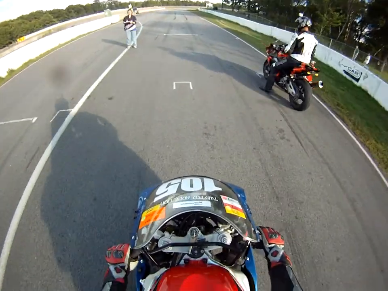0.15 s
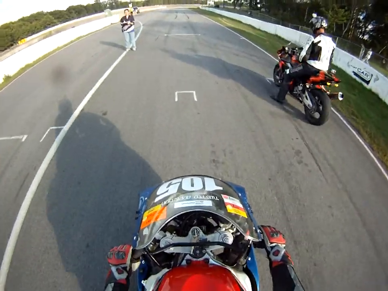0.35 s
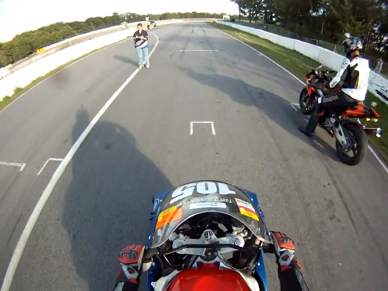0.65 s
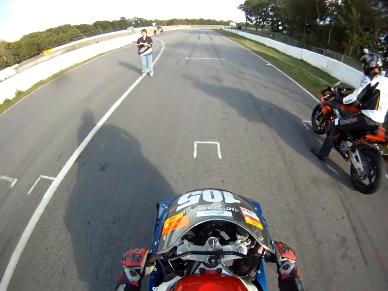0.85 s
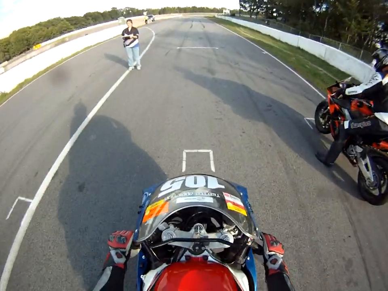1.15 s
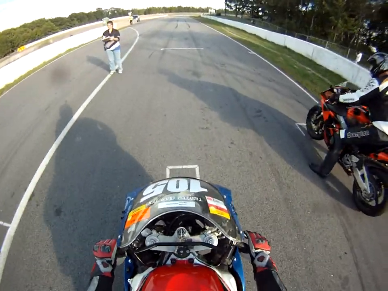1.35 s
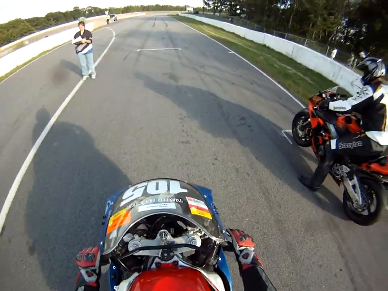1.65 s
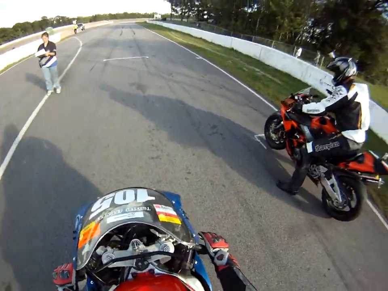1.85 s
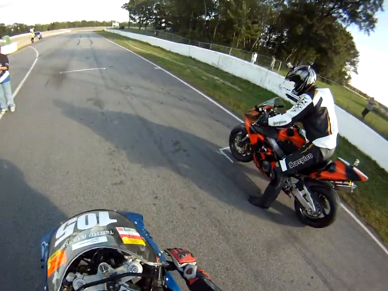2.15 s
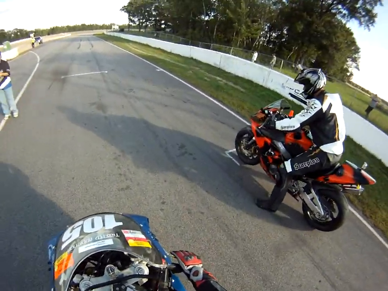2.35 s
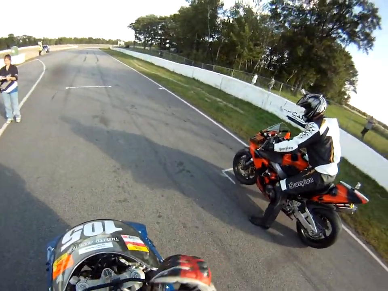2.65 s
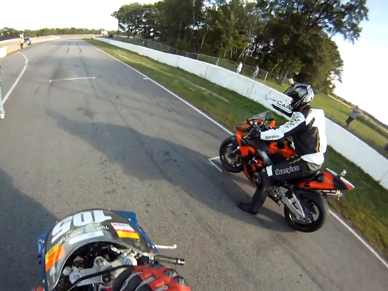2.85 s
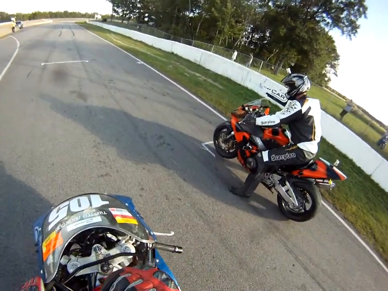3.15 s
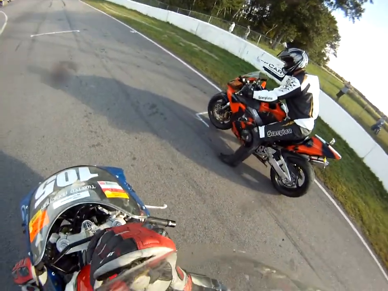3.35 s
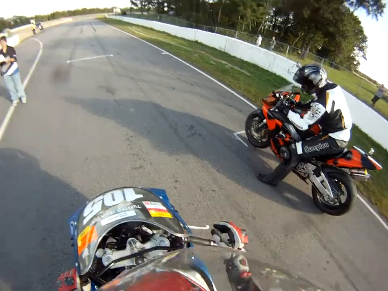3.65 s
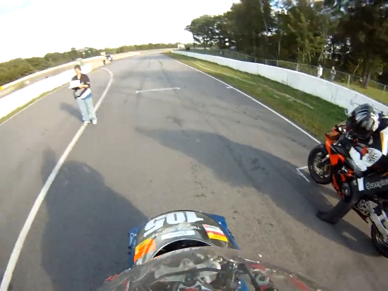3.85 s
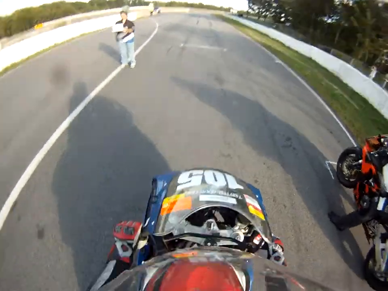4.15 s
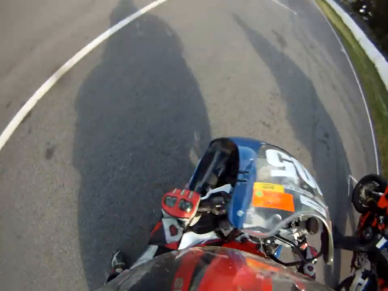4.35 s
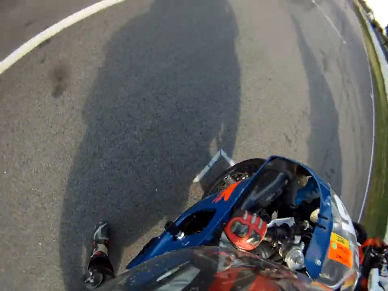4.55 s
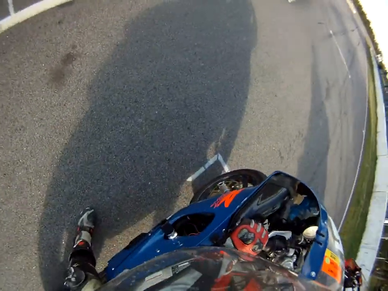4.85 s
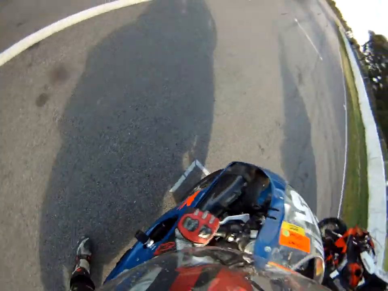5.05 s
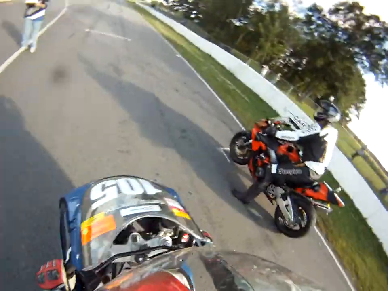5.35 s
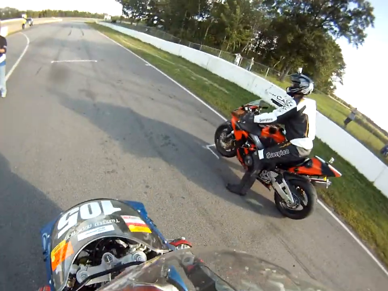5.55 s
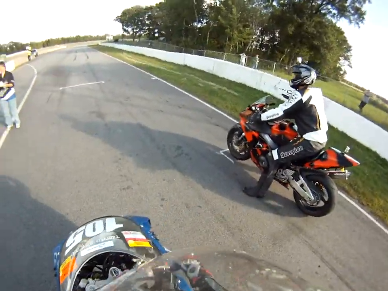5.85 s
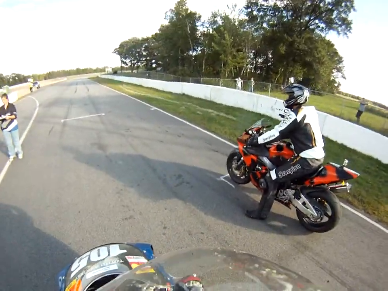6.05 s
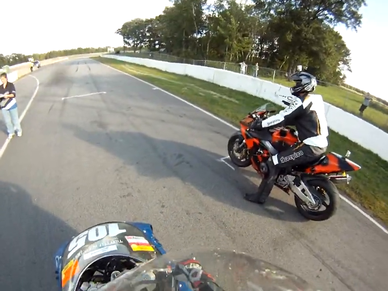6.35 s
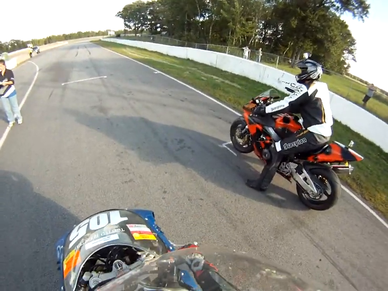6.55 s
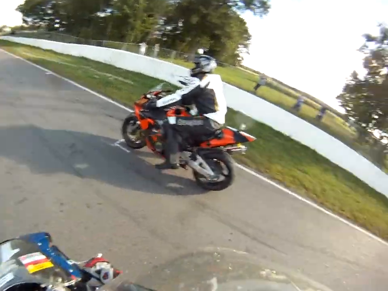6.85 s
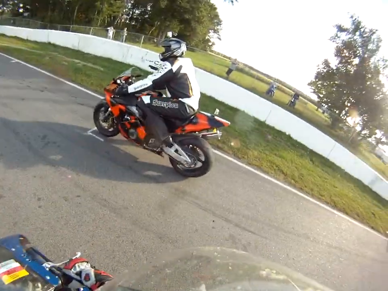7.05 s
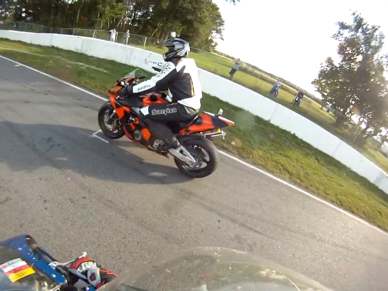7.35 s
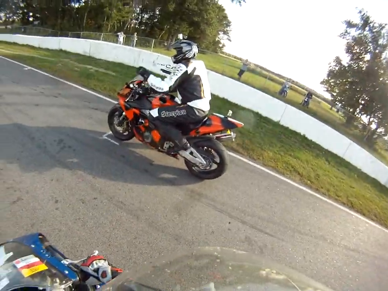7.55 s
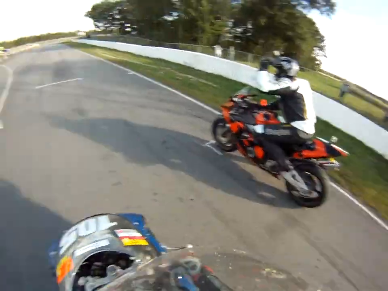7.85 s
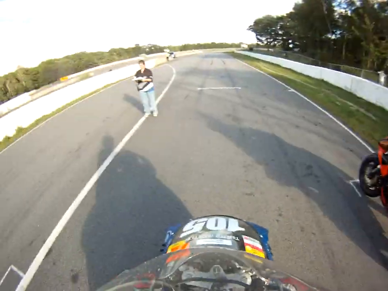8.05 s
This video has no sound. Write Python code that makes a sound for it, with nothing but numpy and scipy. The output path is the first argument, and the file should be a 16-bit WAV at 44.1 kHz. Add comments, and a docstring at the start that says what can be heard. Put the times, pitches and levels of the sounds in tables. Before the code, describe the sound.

Muffled low motorcycle idling with a faint whistle, interrupted by clipping plastic thumps, gritty scrapes and scattered sharp taps against the microphone.

```python
"""Two sport motorcycles idle on a starting grid, under a faint whistle, heard by a helmet camera in a plastic case.
Engines are uneven exhaust pulses, sine drones and fluttering noise; the case muffles them into narrow bands.
Then the rider handles the helmet and looks about: the case clicks, scrapes, squeaks, and sways on its mount.
Bursts of force ring the case's resonances, and fading low sines make the sway.
The hardest knocks clip, and the gain control briefly turns everything down."""
import sys
import numpy as np
from scipy import signal
from scipy.fft import rfft, irfft, next_fast_len
from scipy.io import wavfile
from scipy.ndimage import minimum_filter1d, map_coordinates

SR = 44100
rng = np.random.default_rng(int(sys.argv[2]) if len(sys.argv) > 2 else 0)


def file_out(sig):
    """Save sig as 16-bit WAV at sys.argv[1]."""
    # one column per channel
    cols = np.atleast_2d(sig).T
    # limit, then scale
    lim = np.clip(cols, -1, 1)
    pcm = np.round(lim * 32767).astype(np.int16)
    wavfile.write(sys.argv[1], SR, pcm)


N = 362495
SECONDS = np.arange(N) / SR


def amp(db):
    """Turn decibels into a plain factor."""
    return 10 ** (np.asarray(db) / 20)


def unit(x):
    """Scale a sound to an average (rms) strength of 1."""
    return x / np.sqrt(np.mean(x ** 2) + 1e-20)


def wobble(rate):
    """A smooth random curve with rate random points a second."""
    points = rng.standard_normal(int(N * rate / SR) + 4)
    return map_coordinates(points, [np.arange(N) * rate / SR])


def filtered(x, response):
    """Colour x by a response that depends on frequency."""
    m = next_fast_len(len(x) + SR // 10)
    spectrum = rfft(x, m) * response(np.fft.rfftfreq(m, 1 / SR))
    return irfft(spectrum, m)[:len(x)]


def add(track, s, db, sound):
    """Lay a sound into the track at s seconds with a peak of db."""
    start = round(s * SR)
    part = track[start:start + len(sound)]
    part += amp(db) * sound[:len(part)] / np.abs(sound).max()


def banded(bands, flutter=1):
    """Noise of rms 1, fluttering in level, passed through a set of resonant bands."""
    def gain(f):
        power = sum((amp(db) / (1 + ((f - hz) / width) ** 2)) ** 2 for hz, width, db in bands)
        return np.sqrt(power)
    return unit(filtered(flutter * rng.standard_normal(N), gain))


def swell(at, rise, fall):
    """A rounded rise to 1 at a moment, and a fall after it."""
    t = SECONDS - at
    return 1 / np.cosh(np.clip(t / np.where(t < 0, rise, fall), -40, 40))


def modes(f, rows):
    """Ringing resonances; each row is pitch in Hz, width in Hz, strength as a factor."""
    return sum(gain * 1j * f * w / (hz * hz - f * f + 1j * f * w) for hz, w, gain in rows)


def breeze():
    """Light air presses unevenly on the case: a very low, drifting rumble of noise."""
    return amp(-52.5 + 1.6 * wobble(2.93)) * banded([(11, 31, 0)])


# Swells of a thin whistle.
# Each row: start in seconds, length in seconds, level in dB, pitch in Hz at the top of the swell.
WHISTLE_SWELLS = [(.02, .62, -54, 3660), (.74, .42, -54, 3720), (1.17, .58, -48.5, 3625),
                  (3.5, .45, -56.5, 3650), (4.4, 1.1, -50.5, 3490)]
WHISTLE_ARCH_HZ = 107.8  # pitch lost at the ends of a swell
WHISTLE_UPPER_HZ, WHISTLE_UPPER_DB = 8390, -7  # the upper note, in dB against the lower


def whistle():
    """A faint, fuzzy two-note whistle; each swell arches in strength and pitch, wavering and flickering."""
    level, hz = np.zeros(N), np.zeros(N)
    for s, length, db, top_hz in WHISTLE_SWELLS:
        on = (SECONDS > s) & (SECONDS < s + length)
        arch = np.sin(np.pi * (SECONDS[on] - s) / length)
        level[on] = amp(db) * np.sqrt(arch)
        hz[on] = top_hz - WHISTLE_ARCH_HZ * (1 - arch)

    def tone(pitch):
        fuzz = .6 * (wobble(170) + 1j * wobble(170)) + .4
        turns = np.cumsum(pitch + 28 * wobble(40)) / SR
        return np.real(fuzz * np.exp(2j * np.pi * turns))

    upper = tone(WHISTLE_UPPER_HZ + 60 * wobble(4.4))
    flicker_db = 2.5 * wobble(28)
    return level * amp(flicker_db) * (tone(hz) + amp(WHISTLE_UPPER_DB) * upper)


# The colour of the exhausts inside the case.
# Each row: frequency in Hz, relative level in dB per Hz.
EXHAUST_COLOUR = [(8, -9), (25, -36), (45, -1.5), (70, -0.5), (120, 1.5), (190, -2.5), (280, -4.5),
                  (340, -11), (450, -23), (700, -31.5), (1200, -52)]


def muffled(x):
    """The colour of the exhausts inside the case, at rms 1."""
    hz, db = np.transpose(EXHAUST_COLOUR)

    def colour(f):
        return amp(np.interp(np.log(f + 1), np.log(hz), db)) * (f < 2 * hz[-1])
    return unit(filtered(x, colour))


def firings(turns, cylinders, scatter):
    """One exhaust pulse per firing; the four cylinders differ and idle combustion is uneven."""
    at = np.flatnonzero(np.diff(np.floor(turns)))
    pulses = np.zeros(N)
    pulses[at] = np.resize(cylinders, len(at)) * (1 + scatter * rng.standard_normal(len(at)))
    return muffled(pulses - pulses.mean())


# Loudness of the neighbour's engine. Each row: time in seconds, level in dB.
NEIGHBOUR_LEVEL = [(0, -44), (.9, -47.5), (1.6, -54), (4, -44), (5, -45.5), (5.7, -48), (6.3, -39.5),
                   (7.2, -45.5), (8.22, -42)]
# The notes that drone through the case. Each entry: multiple of the firing rate.
DRONE_ORDERS = [1, 3, 6, 7]
# Their strengths, in the same order. Each entry: level in dB, on top of the engine's loudness.
DRONE_DB = [-4, -7.5, -13, -14.5]
# the firing rate sags once and recovers to its idle
NEIGHBOUR_HZ, SAG_HZ, SAG_AT_S, SAG_HALF_S = 42.8, 4.9, .68, .45


def neighbour_bike():
    """A hunting idle alongside with a few droning notes, over the blurred rumble of the rest of the grid."""
    level_db = np.interp(SECONDS, *np.transpose(NEIGHBOUR_LEVEL))
    rate = NEIGHBOUR_HZ - SAG_HZ * np.exp(-((SECONDS - SAG_AT_S) / SAG_HALF_S) ** 2)
    turns = np.cumsum(rate * (1 + 0.014 * wobble(3))) / SR
    exhaust = firings(turns, [1.3, .75, 1.15, .8], scatter=.2)
    drone = np.zeros(N)
    for order, db in zip(DRONE_ORDERS, DRONE_DB):
        drone += amp(db + 4.0 * wobble(14.0)) * np.sin(2 * np.pi * order * turns)
    grid = amp(wobble(5) - 46) * muffled(rng.standard_normal(N))
    return amp(level_db) * (amp(-2.5) * exhaust + drone) + grid


# Bands in which the case lets airborne sound through.
# Each row: centre in Hz, half width in Hz, relative level in dB.
CASE_BANDS = [(616, 700, -12), (1086, 230, -10.5), (1650, 131, -16.5), (2170, 183, 1.5), (2410, 444, -9.5),
              (3642, 223, -10.5), (4650, 520, -22.5), (5290, 140, -19.5), (6860, 690, -23.5),
              (8340, 310, -18.5), (9550, 410, -25.5), (9754, 244, -11.5), (10800, 500, -30),
              (11930, 690, -30), (13400, 460, -33), (14200, 340, -15), (14700, 400, -33.5)]
# Extra bands heard from above the tank.
# Each row: centre in Hz, half width in Hz, relative level in dB.
TANK_BANDS = [(1710, 98, -4), (2330, 176, 1.5), (3470, 520, -10), (4600, 1500, -25.5), (8427, 580, -18.5),
              (9630, 410, -13.5), (14500, 600, -18.5)]
IDLE_HZ = 49.1  # average firing rate
CLATTER_DB, TANK_DB = -47.6, -47  # engine clatter; the extra with the head fully down
# the rider bends over the tank once; a share of its sound is heard even when upright
BEND_S, UPRIGHT_S, BEND_TAKES_S, UPRIGHT_SHARE = 4.34, 5.45, 0.35, 0.2


def own_bike():
    """A steady idle: two booming notes, exhaust pulses, and valve clatter tied to the crank."""
    turns = np.cumsum(IDLE_HZ * (1 + 0.007 * wobble(9))) / SR
    phase = 2 * np.pi * turns
    drift_db = 2 * wobble(4.0)
    boom = amp(-42.0 + drift_db) * np.sin(phase) + amp(-44.5 + drift_db) * np.sin(2 * phase)
    exhaust = amp(-49.5) * firings(turns, [0.73, 0.51, 0.99, 0.96], scatter=0.34)
    bend = np.minimum(SECONDS - BEND_S, UPRIGHT_S - SECONDS) / BEND_TAKES_S
    head_down = np.clip(bend, UPRIGHT_SHARE, 1)
    flutter = amp(0.35 * np.sin(2 * phase) + .5 * np.sin(phase / 2) + 1.17 * wobble(170))
    clatter = amp(CLATTER_DB + 0.43 * wobble(3.95)) * banded(CASE_BANDS, flutter)
    above_tank = amp(TANK_DB) * head_down * banded(TANK_BANDS, flutter)
    return boom + exhaust + clatter + above_tank


# Bands of the thin swish. Each row: centre in Hz, half width in Hz, relative level in dB.
SWISH_BANDS = [(2200, 190, 4), (3540, 250, -7), (5260, 220, -6), (6720, 170, -7), (8350, 260, -15),
               (9830, 160, -4.5), (11900, 400, -20), (14300, 400, -18)]
# Bands of the broad hiss. Each row: centre in Hz, half width in Hz, relative level in dB.
HISS_BANDS = [(2600, 400, -0.5), (3700, 300, -2), (5000, 400, -6), (8600, 700, -13)]
# the helmet rubs against the collar in one turn of the head
SCUFF_AT_S, SCUFF_DB, SCUFF_HALF_S = 6.28, -32, 0.055
HISS_AT_S, HISS_DB, HISS_HALF_S = 6.28, -50.5, 0.11
SWISH_AT_S, SWISH_DB, SWISH_RISE_S, SWISH_FALL_S = 6.37, -41.5, 0.053, 0.049


def rub():
    """The grainy rub of the helmet as the head turns: a low scuff, a broad hiss, and a thin swish."""
    hiss = amp(HISS_DB) * swell(HISS_AT_S, HISS_HALF_S, HISS_HALF_S) * banded(HISS_BANDS)
    swish = amp(SWISH_DB) * swell(SWISH_AT_S, SWISH_RISE_S, SWISH_FALL_S) * banded(SWISH_BANDS)
    scuff_noise = banded([(190, 106, 0), (800, 300, -25)])
    scuff = amp(SCUFF_DB) * swell(SCUFF_AT_S, SCUFF_HALF_S, SCUFF_HALF_S / 2) * scuff_noise
    grain = amp(1.4 * wobble(60))
    return grain * (hiss + swish + scuff)


# Thin, glassy ticks as the helmet catches while turning. Each row: start in seconds, peak in dB.
TICKS = [(6.287, -25), (6.302, -32), (6.309, -34), (6.408, -28), (6.479, -35)]
# The notes that a tick rings. Each row: pitch in Hz, width in Hz, relative level in dB.
TICK_MODES = [(9900, 300, 0), (11100, 500, -5), (13100, 600, -3), (14300, 400, 0)]
TICK_S = .003  # decay of the force


def ticks():
    """Tiny slips, as short bursts of noise, ring only the highest modes of the plastic."""
    track, t = np.zeros(N), np.arange(SR // 40) / SR
    rows = [(hz, w, amp(db)) for hz, w, db in TICK_MODES]
    for s, db in TICKS:
        force = rng.standard_normal(len(t)) * np.exp(-t / TICK_S)
        add(track, s, db, filtered(force, lambda f: modes(f, rows)))
    return track


# Resonances of the struck case. Each row: pitch in Hz, width in Hz, relative level in dB.
SHELL_MODES = [(290, 140, -7.5), (567, 100, -6.5), (733, 75, 3.5), (968, 161, 6.5), (1290, 303, 1.5),
               (1510, 225, 0.5), (2188, 197, 2.5), (2590, 330, -5), (3630, 206, -3.5), (5270, 370, -24.5),
               (8470, 496, -10.5), (9900, 180, -6), (10900, 240, -11), (13650, 140, -17.5),
               (13600, 820, -11)]


def shell(f):
    """How the struck case rings, starting only after the strike; neighbouring modes push opposite ways."""
    return modes(f, [(hz, w, (-1) ** k * amp(db)) for k, (hz, w, db) in enumerate(SHELL_MODES)])


def struck(force, bright_db):
    """The case's answer to a force, at peak 1; bright_db tilts the treble by that much per octave."""
    sound = filtered(force, lambda f: shell(f) * amp(bright_db * np.log2(f / 1000 + 0.036)))
    return sound / np.abs(sound).max()


# Plastic slipping on plastic. Each row: loudest moment in seconds, peak in dB, slip rate in Hz
# at that moment, half length in seconds, fall in octaves a second.
SQUEAKS = [(2.915, -7, 1800, 0.0044, 37), (2.957, -14, 1550, 0.0065, 60)]


def squeaks():
    """A quick run of slips, sliding down in pitch, rings the case."""
    track, t = np.zeros(N), np.arange(-SR // 150, SR // 40) / SR
    for s, db, hz, length, fall in SQUEAKS:
        uneven = 1 + .27 * rng.standard_normal(len(t))
        slips = np.cumsum(hz * 2 ** (-fall * t) * uneven) / SR
        pulses = np.diff(np.floor(slips), prepend=0)
        force = pulses / np.hypot(1, t / length) ** 4.6
        add(track, s + t[0], db, struck(force, bright_db=-1.5))
    return track


def swing(hz, t60):
    """One low mode, building up within a cycle and fading by 60 dB in t60 seconds."""
    t = np.arange(2 * SR // 3) / SR
    build_up = 1 - np.exp(-(t * hz / 0.34) ** 2)
    return np.sin(2 * np.pi * hz * t) * build_up * np.exp(-np.log(1000) * t / t60)


# Sharp taps against the case. Each row: start in seconds, peak in dB, ring in Hz,
# brightness in dB per octave, swing of the camera in dB.
TAPS = [(2.055, -15.5, 987, 0, -26), (3.117, -34.5, 1230, 1, -32), (3.305, 13, 1480, 0, -16),
        (3.414, -16.5, 710, -10, -22), (3.843, -33, 1020, -1, -42), (4.0761, -22.5, 2150, 2, -37),
        (4.1572, -4, 996, -1, -13.5), (4.401, -28, 1023, -2, -38), (4.584, -26.5, 1005, -6, -41),
        (5.5063, -6.5, 1052, 2.7, -32), (5.6914, -10, 2060, 4, -42), (6.2863, -13, 2130, -3, -25),
        (6.407, -20.5, 993, -1.5, -36), (6.477, -23.5, 1190, -3, -44), (6.9688, -25.5, 695, 1.5, -39),
        (7.809, -35, 1050, 1, -49)]
# Knocks that swing the camera and scrape its mount. Each row: start in seconds, swing in dB,
# swing rate in Hz, scrape in dB, scrape length in seconds.
KNOCKS = [(2.872, -2.5, 68, -13, 0.0068), (2.889, -23, 82, -28, 0.0026), (2.932, -16, 75, -38, 0.0026),
          (2.983, -18, 127, -9.5, 0.024), (2.995, 1.5, 77, -23, 0.0095), (3.029, -19, 132, -14, 0.0061),
          (3.046, -33, 95, -22.5, 0.013), (3.076, -1.5, 71, -10, .009), (3.266, -10.5, 46, -27, 0.021),
          (3.294, -6.5, 102, -4.5, .012), (3.38, -6, 75, -14, 0.014), (4.265, -13, 42, -17, 0.0158),
          (4.29, -5.5, 52, -11, .016), (4.619, -27.5, 67.6, -40, .005), (6.285, -23, 251, -20, 0.0046),
          (6.295, -30, 90, -19, 0.013), (6.327, -16, 54.3, -45, .005), (6.479, -10, 65, -28.5, 0.0086),
          (6.569, -15.5, 56.4, -38, 0.0023), (6.742, -20, 51.5, -44, 0.0045), (6.972, -13, 60, -29.5, .018),
          (7.001, -10, 67, -25, 0.0045), (7.034, -18, 72.3, -35, 0.0098), (7.878, -16.5, 55, -35.5, 0.0026),
          (8.153, -25.5, 60, -49, .005)]
# Hard blows on the case. Each row: start in seconds, crash in dB, crash length in seconds, ring in Hz,
# brightness in dB per octave, thud in dB, thud pitch in Hz, rocking in dB, rattle in dB.
BLOWS = [(2.974, -5.5, 0.0033, 893, -3, -1, 191, -32, -27), (3.301, 13, .012, 730, -1, -1, 284, -6.5, -3.5),
         (4.126, -3, 0.0025, 962, -1.5, 0.5, 175.4, -22.5, -23),
         (4.28, -9, .018, 1300, -1, 0, 111, -15, -31)]
# Modes in which the helmet rocks on after a blow, the upper two beating together.
# Each row: rate in Hz, level in dB against the blow's rocking, time to fade by 60 dB in seconds.
ROCKING = [(75, -1.5, .6), (90, -1, .66), (42.1, -10, 0.95)]
# a swing at SWING_REF_DB lasts SWING_T60_S; this many dB harder halves the time, as it rubs itself out
SWING_T60_S, SWING_REF_DB, SWING_HALVES_DB = 0.13, -13.5, 10.5
BRACKET_HZ, BRACKET_DB, BRACKET_T60_S = 252, -18, 0.067  # the stiffer mode that rings with every swing
TAP_SWING_HZ = 80.7  # a tap swings the camera at this rate
THUD_T60_S = 0.043


def mount():
    """Every knock and tap swings the camera; hard blows thud and leave the helmet rocking."""
    track = np.zeros(N)
    pushes = [(s, db, hz) for s, db, hz, _, _ in KNOCKS]
    pushes += [(s, db, TAP_SWING_HZ) for s, _, _, _, db in TAPS]
    for s, db, hz in pushes:
        t60 = SWING_T60_S * 2 ** ((SWING_REF_DB - db) / SWING_HALVES_DB)
        add(track, s, db, swing(hz, t60))
        add(track, s, db + BRACKET_DB, swing(BRACKET_HZ, BRACKET_T60_S))
    for s, _, _, _, _, thud_db, thud_hz, rocking_db, _ in BLOWS:
        add(track, s, thud_db, swing(thud_hz, THUD_T60_S))
        for hz, db, t60 in ROCKING:
            add(track, s, rocking_db + db, swing(hz, t60))
    return track


CONTACT_HZ = 4200  # plastic gives a little, softening a tap above this
RING_SHARE, RING_S = 0.64, 0.0041  # the struck part's own note in a tap, and its decay


def tap(hz, bright_db):
    """A strike and a brief buzz of rebounds ring the case, and the struck part adds its own note."""
    t = np.arange(SR // 8) / SR
    force = .06 * rng.standard_normal(len(t)) * np.exp(-(t / .005) ** 4)
    force[0] += 1
    force = filtered(force, lambda f: 1 / (1 + 1j * f / CONTACT_HZ))
    note = np.sin(2 * np.pi * hz * t) * (1 - np.exp(-t / 0.0006)) * np.exp(-t / RING_S)
    return struck(force, bright_db) + RING_SHARE * note


def grit(t):
    """The force of plastic catching and slipping: noise whose level jumps about."""
    catches = amp(4.2 * map_coordinates(rng.standard_normal(len(t)), [t * 600], order=1))
    return rng.standard_normal(len(t)) * catches


def scrape(length, bright_db):
    """A snap and a gritty slide, with a weaker tail, ring the case."""
    t = np.arange(SR // 6) / SR
    force = grit(t) * (np.exp(-(t / length) ** 6) + amp(-17) * np.exp(-t / .01))
    force[0] += 2.5
    return struck(force, bright_db)


RATTLE_T60_S, RATTLE_BRIGHT_DB = 0.22, -3  # fade of the force by 60 dB; tilt per octave


def rattle():
    """Loose parts chatter against the case and settle."""
    t = np.arange(SR // 8) / SR
    return struck(grit(t) * amp(-60 * t / RATTLE_T60_S), RATTLE_BRIGHT_DB)


# tilt per octave of a scrape at SCRAPE_REF_DB; firmer contacts are brighter
SCRAPE_BRIGHT_DB, BRIGHTER_PER_DB, SCRAPE_REF_DB = -1.5, 0.18, -7
SNAP_DELAY_S = .002  # from the start of a blow's scrape to its tap


def contacts():
    """Taps click, knocks scrape (brighter when firm), and a hard blow does both and ends in a rattle."""
    track = np.zeros(N)
    for s, db, hz, bright_db, _ in TAPS:
        add(track, s, db, tap(hz, bright_db))
    for s, _, _, db, length in KNOCKS:
        bright_db = SCRAPE_BRIGHT_DB + BRIGHTER_PER_DB * (db - SCRAPE_REF_DB)
        add(track, s, db, scrape(length, bright_db))
    for s, db, length, hz, bright_db, _, _, _, rattle_db in BLOWS:
        add(track, s, db, scrape(length, bright_db))
        add(track, s + SNAP_DELAY_S, db, tap(hz, bright_db))
        add(track, s + length, rattle_db, rattle())
    return track


DEAD_HZ, DEAD_WIDTH_HZ, DEAD_DB = 6080, 240, -7.5  # a band that the case weakens


def scene():
    """One microphone in the case feeds both channels; the case sizzles faintly while it sways."""
    sway = mount()
    sizzle = amp(-36.5) * np.tanh(sway * 6) / 6 * banded([(12000, 110, 0)])
    around = breeze() + whistle() + neighbour_bike() + own_bike()
    handling = rub() + ticks() + squeaks() + sway + sizzle + contacts()
    dead_band = lambda f: amp(DEAD_DB * np.exp(-((f - DEAD_HZ) / DEAD_WIDTH_HZ) ** 2))
    mono = filtered(around + handling, dead_band)
    return np.array([mono, mono])


def gain_control(x, threshold_db, attack, hold, release_db, range_db):
    """Peaks over the threshold pull the gain down; it holds, then climbs back at release_db a second."""
    over = np.clip(20 * np.log10(np.abs(x) + 1e-9) - threshold_db, 0, range_db)
    size = 2 * int(hold * SR / 2) + 1
    held = -minimum_filter1d(-over, size, origin=size // 2)  # the largest excess of the last moments
    climb = release_db * SECONDS
    cut = np.maximum.accumulate(held + climb) - climb
    step = 1 - np.exp(-1 / (attack * SR))
    return x * amp(-signal.lfilter([step], [1, step - 1], cut))


def record(dry):
    """Gain control too slow for the sharpest knocks, clipping, and the band limit."""
    level = gain_control(dry[0], threshold_db=-4.5, attack=0.0059, hold=0.072, release_db=109, range_db=16.5)
    clipped = np.clip(level, -.95, .95)
    out = filtered(clipped, lambda f: f < 15550)  # nothing above this many Hz
    return np.array([out, out])


dry = scene()
out = record(dry)
file_out(out)
```